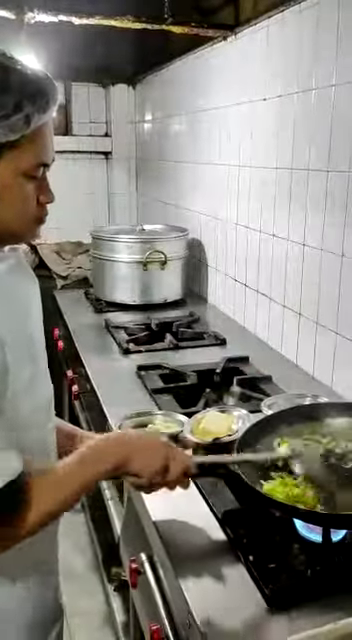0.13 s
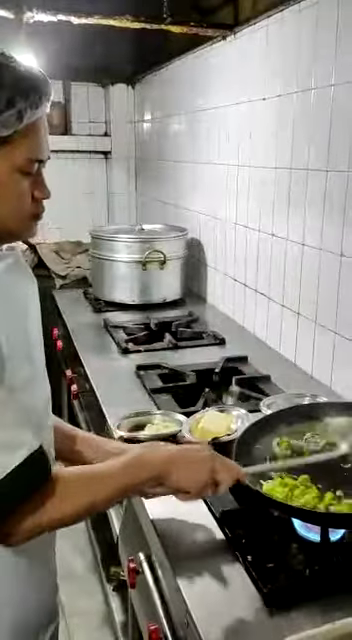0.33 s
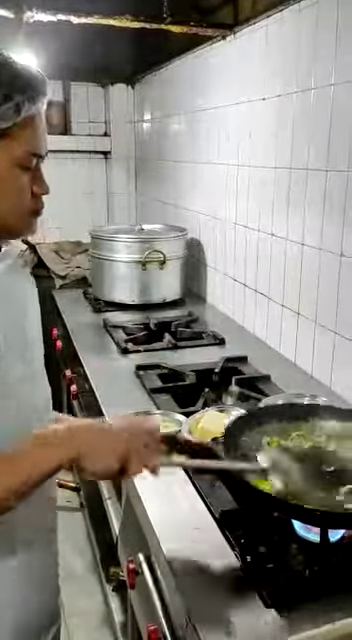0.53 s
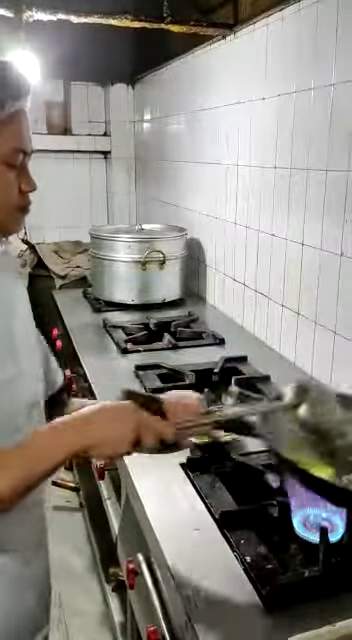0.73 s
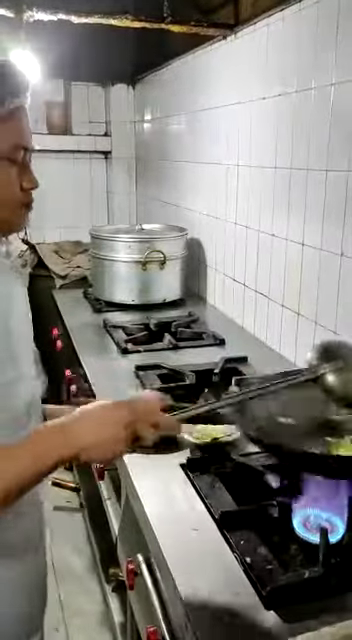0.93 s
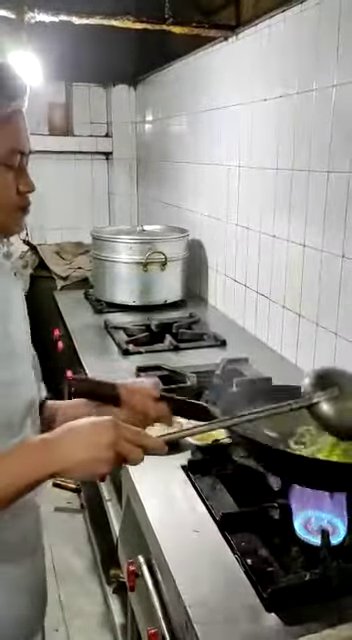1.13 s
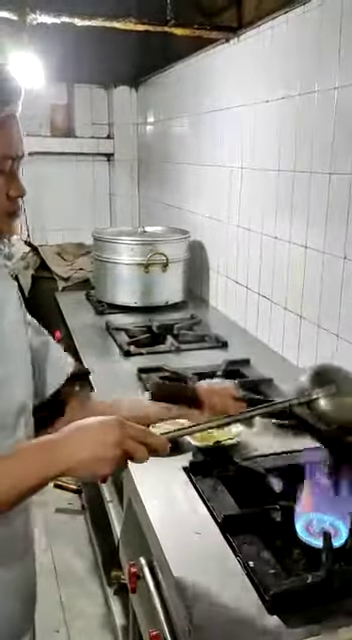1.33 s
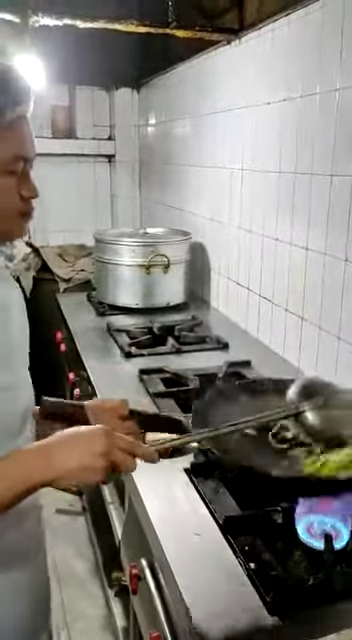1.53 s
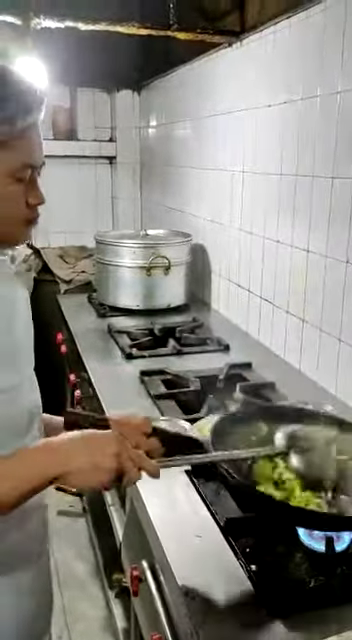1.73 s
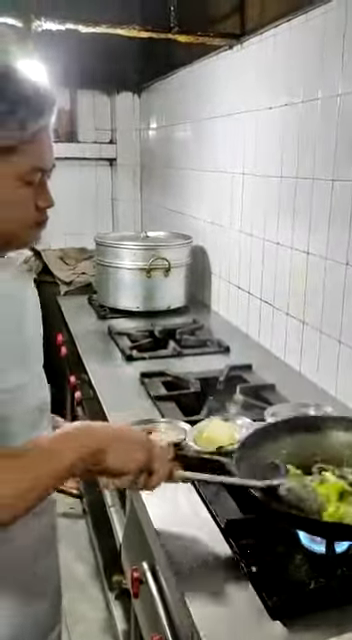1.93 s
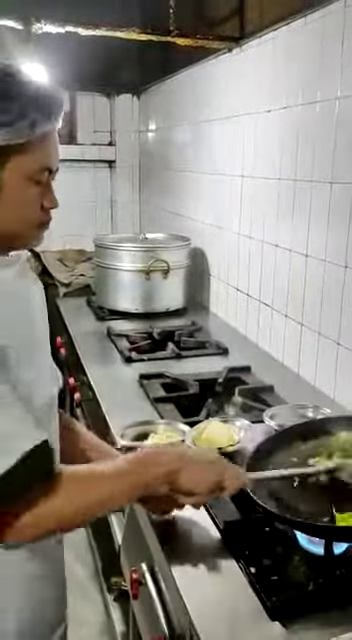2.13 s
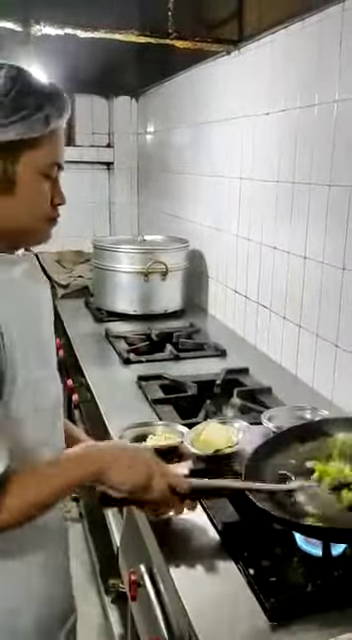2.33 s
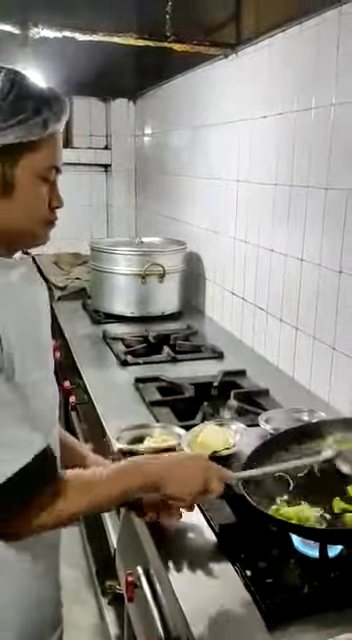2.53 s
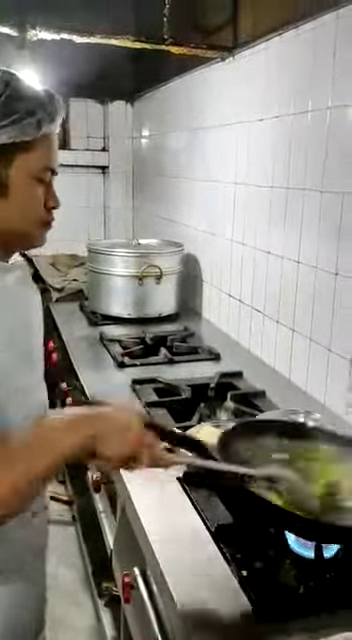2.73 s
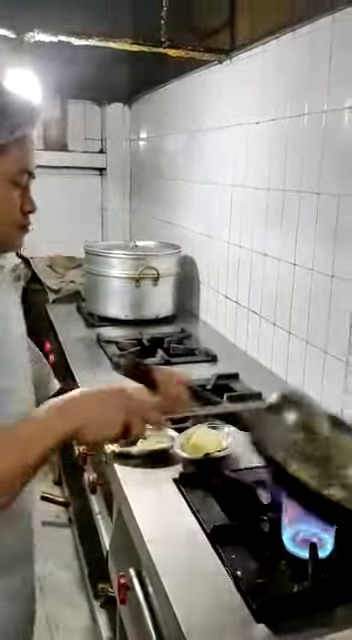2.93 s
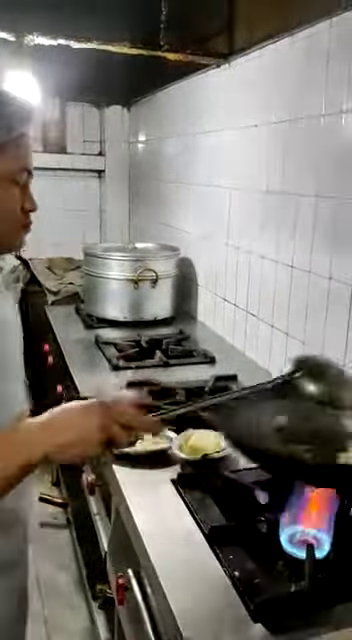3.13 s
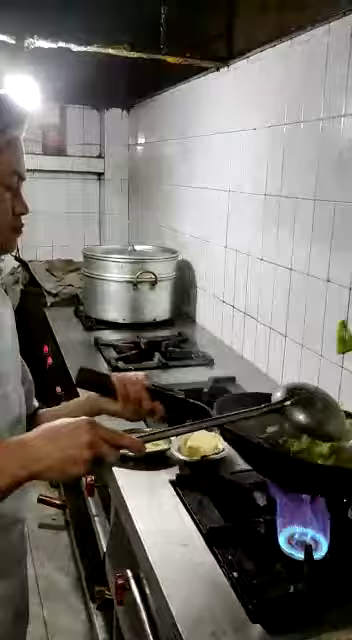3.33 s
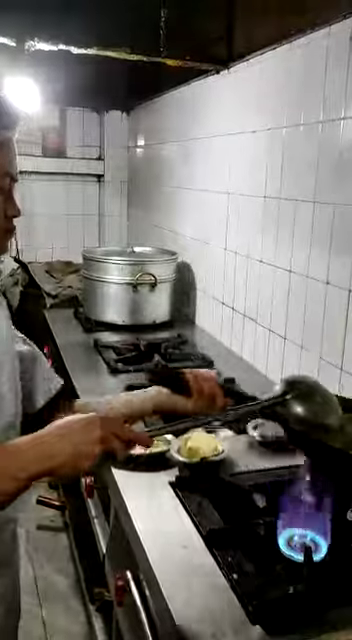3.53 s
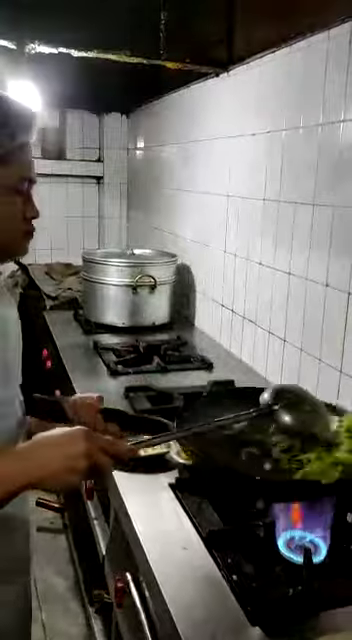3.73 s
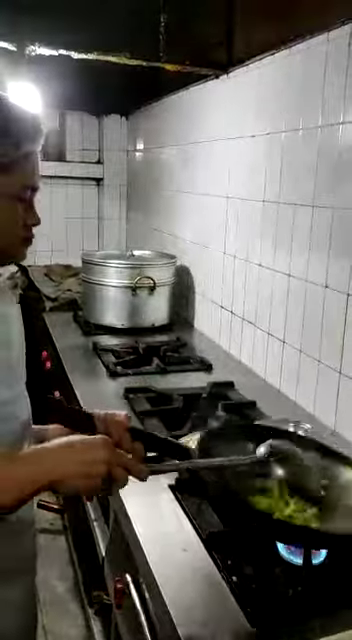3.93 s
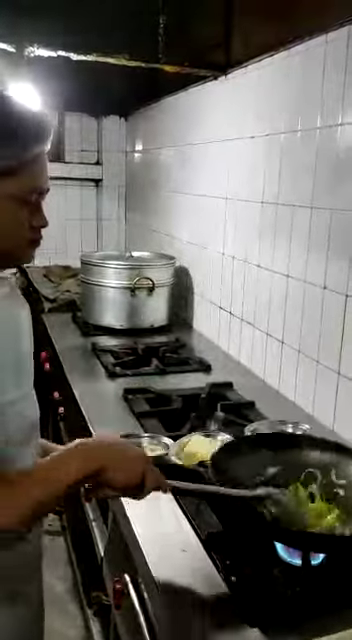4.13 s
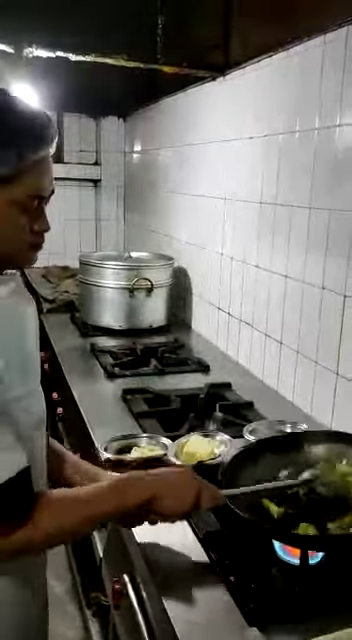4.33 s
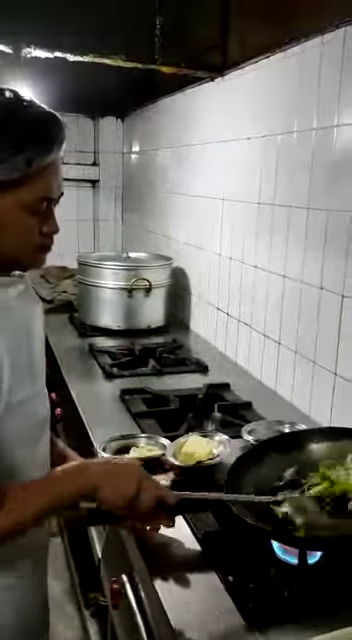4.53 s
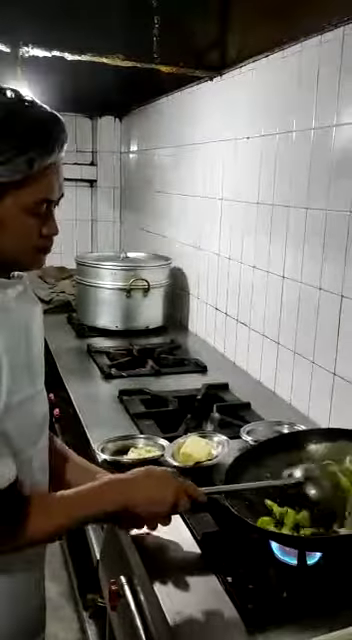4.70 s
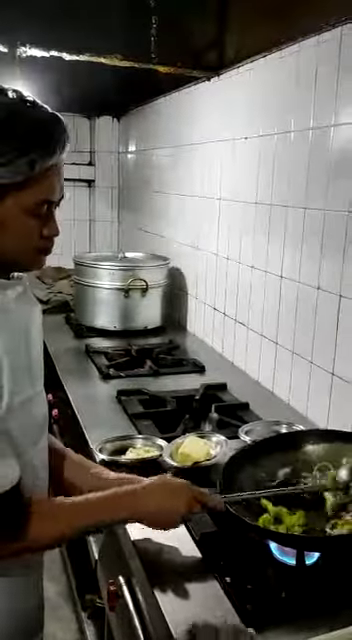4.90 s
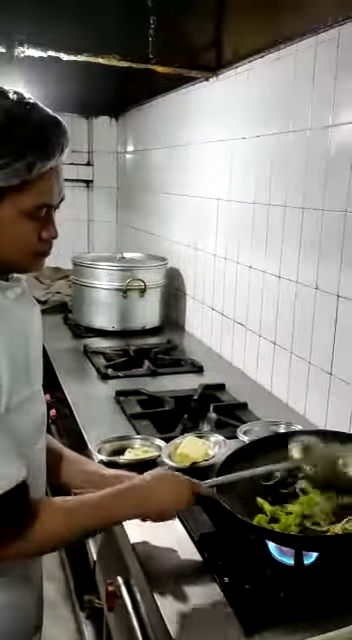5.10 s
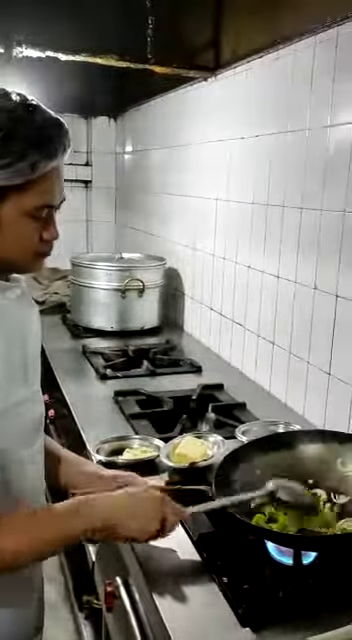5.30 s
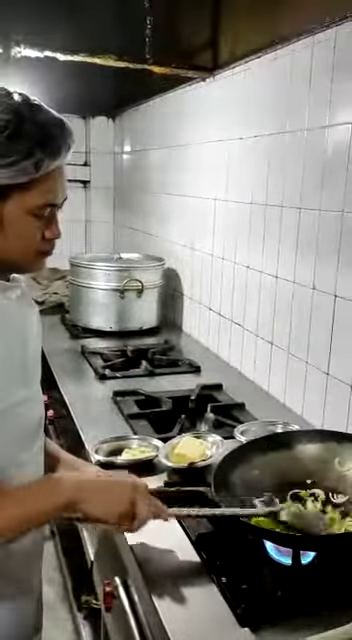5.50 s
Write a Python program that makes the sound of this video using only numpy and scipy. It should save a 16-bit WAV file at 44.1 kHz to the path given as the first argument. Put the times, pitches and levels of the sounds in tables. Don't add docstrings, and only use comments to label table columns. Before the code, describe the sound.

A bright, dense frying sizzle runs throughout, strongest in the high treble, with a softer spitting underneath. At first a ladle scrapes lightly; from 0.6 to 0.85 s it knocks the wok several times with a sharp crack and gritty drag. From about 1 to 1.75 s mostly sizzle remains, swelling and dipping with the toss. Knocks and scrapes return at 1.8-2.15 s, with a faint touch near 2.4. A hard, rapid clatter with bright cracks comes at 2.8-2.95 s. The hiss then dips deeply around 3.3 s. Heavy clanks and scrapes follow at 4.04-4.3 s, a smaller knock at 4.67, and a sharp scraping crack with a sizzling flare at 5.0, then light touches. Beneath, a gas flame flutters and roars softly, and a low wavering motor drone fades before 3 s. Close stereo phone pickup, short tiled-room reflections, loud peaks slightly rounded.

```python
import sys
import numpy as np
from scipy import signal
from scipy.fft import rfft, irfft, next_fast_len
from scipy.io import wavfile
from scipy.ndimage import uniform_filter1d

SR = 44100
rng = np.random.default_rng(int(sys.argv[2]) if len(sys.argv) > 2 else 0)


def bounce(signal):
    frames = np.transpose(np.atleast_2d(signal))
    limited = np.clip(frames, -1, 1)
    pcm = np.round(limited * 32767).astype(np.int16)
    wavfile.write(sys.argv[1], SR, pcm)


def voltage_ratio(level):
    return 10 ** (np.asarray(level, float) / 20)


N = 245195
TIME = np.arange(N) / SR


def unit(x):
    return x / np.sqrt(np.mean(x ** 2))


def columns(table):
    s, *rest = np.transpose(table)
    return [np.interp(TIME, s, column) for column in rest]


def on_log_axis(points, hz):
    f, value = np.transpose(points)
    return np.interp(np.log(hz + 1), np.log(f + 1), value)


def band(x, lo_hz, hi_hz):
    return signal.sosfilt(signal.butter(2, [lo_hz, hi_hz], "band", fs=SR, output="sos"), x)


def hump(middle_s, length_s):
    return np.cos(np.pi * np.clip((TIME - middle_s) / length_s, -.5, .5)) ** 2


def walk(rate):
    hold = int(SR / rate)
    levels = np.repeat(rng.standard_normal(N // hold + 1), hold)
    smooth = uniform_filter1d(uniform_filter1d(levels, hold), hold)
    return unit(smooth[:N])


def clicks(rate, spread_db):
    happens = rng.random(N) < rate / SR
    size = rng.exponential(size=N)
    sign = rng.choice([-1, 1], N)
    return unit(happens * sign * voltage_ratio(spread_db * np.minimum(size, 2)))


def bands(source, colour, flicker_db, flicker_rate):
    # frequency in Hz, likeness from 0 (unrelated) to 1 (same).
    likeness = [(60, 0.89), (130, 0.96), (290, 0.84), (630, 0.39), (1380, 0.03), (3020, 0.1), (6620, -0.03),
                (14500, -0.01)]
    size = next_fast_len(N)
    hz = np.arange(size // 2 + 1) * SR / size
    like = np.clip(on_log_axis(likeness, hz), -.9, .99)
    mid = rfft(source(), size) * np.sqrt(1 + like)
    side = rfft(source(), size) * np.sqrt(1 - like)
    pair = np.array([mid + side, mid - side]) * voltage_ratio(on_log_axis(colour, hz))
    place = 2 * np.log2((hz + 1) / colour[0][0])
    count = int(2 * np.log2(colour[-1][0] / colour[0][0])) + 2
    total = 0
    for k in range(count):
        share = np.cos(np.pi / 2 * np.clip(place - k, -1, 1)) ** 2
        total = total + irfft(pair * share, size)[:, :N] * voltage_ratio(flicker_db * walk(flicker_rate))
    return unit(total)


def ring(modes, drag, blows, count, scatter, roam_db, spread_hz):
    out, power = 0, 0
    for centre_hz, db, t60 in modes:
        push = (drag + blows) * voltage_ratio(db + roam_db * np.clip(walk(14), -1.5, 1.5))
        for k in range(count):
            hz = centre_hz * (1 + scatter * rng.uniform(-1.09, 1) * (k > 0))
            pole = np.exp(2j * np.pi * hz / SR - np.log(1000) / (t60 * SR))
            start_phase = np.exp(2j * np.pi * rng.random())
            z = signal.lfilter([start_phase], [1, -pole], push)
            turn = np.exp(.5j * np.pi * rng.uniform(-1.07, 1) * min(hz / spread_hz, 1) ** 2)
            out = out + np.array([(z * turn).imag, (z / turn).imag])
            power += voltage_ratio(db) ** 2 / (1 - abs(pole) ** 2) / 2
    return out / np.sqrt(power)


def contact(start_s, hold_s, db, attack_s, release_db_s):
    t = TIME - start_s
    return np.clip(t / attack_s, 0, 1) * voltage_ratio(db - release_db_s * np.clip(t - attack_s - hold_s, 0, 1))


def pressure():
    # start in seconds, hold in seconds, pressure in dB, rim share in dB.
    drag_times = [(0.0, 0.08, -39, -14), (0.127, 0.07, -37.5, -4), (0.37, 0.2, -43.5, -8),
                  (0.59, 0.23, -30, -6), (0.726, 0.064, -24, -10.5), (1.795, 0.02, -25, -12),
                  (1.896, 0.063, -29, -1), (1.964, 0.06, -25.5, -4.5), (2.055, 0.12, -31, -34),
                  (2.438, .05, -41, -8.5), (2.657, 0.13, -45, 0.5), (2.777, 0.14, -28.5, -4.5),
                  (2.839, .13, -23, -18), (4.04, .03, -20.5, -12), (4.098, 0.07, -24, -7),
                  (4.254, 0.046, -22.5, -10.5), (4.364, 0.18, -39.5, -9), (4.634, 0.056, -42.5, 1.5),
                  (4.989, 0.018, -24, -14), (5.07, 0.041, -34.5, -21), (5.303, .03, -65, 7)]
    # start in seconds, hold in seconds, level in dB.
    scrape_times = [(0.0, 0.51, -34.5), (0.588, .03, -26.5), (0.72, 0.033, -35), (0.954, 0.12, -40.5),
                    (1.966, 0.079, -28), (2.136, 0.067, -28.5), (2.409, 0.41, -34.5), (2.782, 0.016, -19.5),
                    (2.832, 0.031, -26.5), (2.973, 0.025, -43), (3.102, 0.048, -31.5),
                    (4.029, 0.045, -23.5), (4.148, 0.034, -22.5), (4.255, 0.15, -30), (4.548, 0.26, -37.5),
                    (4.994, 0.011, -19), (5.03, 0.099, -27.5), (5.32, 0.046, -36)]
    drags = np.array([contact(s, hold, db, attack_s=0.0061, release_db_s=107) ** 2
                      for s, hold, db, _ in drag_times])
    edge = sum(contact(*row, attack_s=0.0043, release_db_s=131) ** 2 for row in scrape_times)
    rim_share = voltage_ratio(np.array(drag_times)[:, 3]) ** 2
    return np.sqrt([drags.sum(axis=0), rim_share @ drags, edge])


def wok(gain):
    # time in seconds, peak in dB, rim share in dB, ladle ring share in dB.
    knock_times = [(0.604, -20.5, -36, -9), (0.676, -14.5, -11.5, -21), (0.74, -9.5, -15, -22.5),
                   (0.821, -12, -26, -25), (1.801, -18.5, -11, -14), (1.87, -19.5, -28, -27),
                   (1.906, -16.5, -16, -12.5), (1.958, -22.5, -9, -1), (2.423, -38, -25, -15),
                   (2.789, -24.5, -16, 0.5), (2.84, -11.5, -13, -23), (2.881, -13.5, -13, -7.5),
                   (2.92, -12, -20, -32), (2.944, -16, -16.5, -31), (3.672, -37, -17, 5.5),
                   (4.041, -5, -16.5, -19), (4.06, -29, -30, -11), (4.116, -28, -17, -23),
                   (4.16, -13, -21, -27), (4.269, -16.5, -9.5, -9.5), (4.669, -22, -30, -8),
                   (4.991, -42, -25, 3), (4.997, -36, -18, -23), (5.219, -39, -3, -5),
                   (5.314, -42.5, -26, 4)]
    # frequency in Hz, level in dB, seconds to fade by 60 dB.
    bowl_modes = [(132.2, 1.5, 0.26), (188, -21, 0.13), (251, 7.5, 0.14), (263.5, 1, 0.086), (294, 4, 0.06),
                  (331.6, 3.5, 0.18), (366, 2, 0.3), (433, -3, 0.048), (453, 3.5, 0.1), (488, -1.5, 0.11),
                  (545, -1, 0.095), (573, -13.5, 0.08), (342, 2.5, 0.034)]
    rim_modes = [(725, -5, 0.063), (770.6, -6, 0.13), (870, 2, 0.064), (949, 4.5, 0.048), (1023, 8, 0.027),
                 (1050, -7.5, 0.12), (1099, 3, 0.061), (1147, 2, 0.034), (1240, -19, 0.03),
                 (1340, -4.5, 0.072), (1501, -5, 0.056), (1750, -14.5, 0.14), (2110, -10.5, 0.067),
                 (830, 14, 0.0055)]
    ladle_modes = [(2435, 2.5, 0.057), (2590, 12, 0.02), (2860, -13, 0.58), (3325, -1, 0.26),
                   (3436, 8.5, 0.25), (3560, 0, 0.081), (3504, 2, 0.29), (3850, 9.5, 0.1),
                   (4106, 8.5, 0.11), (4140, -15, 0.085), (4460, 5, 0.25), (4620, 9.5, 0.17),
                   (4990, 7, 0.13), (5190, 6.5, 0.14), (5743, 6.5, 0.55), (6150, 8.5, 0.038),
                   (7100, -4, 0.11)]
    s, db, rim_db, ladle_db = np.transpose(knock_times)
    blows = np.zeros((3, N))
    blows[:, (s * SR).astype(int)] = voltage_ratio([db, db + rim_db, db + ladle_db])
    slip = clicks(600, spread_db=1.5)
    grit = clicks(2500, spread_db=6.0)
    bowl = ring(bowl_modes, gain[0] * slip, voltage_ratio(19.5) * blows[0],
                count=2, scatter=0.029, roam_db=2.5, spread_hz=730)
    rim = ring(rim_modes, gain[1] * slip, voltage_ratio(26) * blows[1],
               count=3, scatter=0.0485, roam_db=4.0, spread_hz=1120)
    pressed = [(hz, level, .22 * t60) for hz, level, t60 in ladle_modes]
    scrape = ring(pressed, gain[2] * grit * voltage_ratio(-5.0), 0,
                  count=3, scatter=0.037, roam_db=5.5, spread_hz=850)
    free = [(hz, level, 1.7 * t60) for hz, level, t60 in ladle_modes]
    clang = ring(free, 0, voltage_ratio(26.5) * blows[2],
                 count=2, scatter=0.0444, roam_db=6.5, spread_hz=850)
    return band(bowl, 65, 720) + band(rim, 600, 2400) + band(scrape + clang, 1400, 6000)


def frying():
    # frequency in Hz, level in dB per Hz.
    fry_colour = [(880, -32.5), (1500, -28.5), (1800, -28.5), (1960, -25.5), (2550, -24.5), (2780, -23.5),
                  (4240, -18.5), (4760, -18.5), (6920, -13.5), (8800, 0), (9600, -6), (10600, -4),
                  (13800, -13.5), (14500, -42), (14900, -93)]
    # time in seconds, level in dB, extra low spit in dB.
    heat = [(0.0, -21.5, -1.5), (0.6, -21, 1.5), (1.0, -17.5, 1), (1.45, -16.5, 0.5), (1.75, -21.5, 0),
            (2.5, -20.5, 0.5), (3.1, -19, -1.5), (3.6, -22.5, 0.5), (4.35, -20, -1), (4.55, -26, 1),
            (4.9, -22.5, -3), (5.56, -21, 1.5)]
    # middle in seconds, length in seconds, depth in dB.
    covers = [(0.426, .2, -2.5), (0.67, 0.12, -2.5), (0.856, .2, -1.5), (1.111, 0.21, -6.5),
              (1.384, 0.17, -2.5), (1.618, 0.27, -6.5), (1.927, 0.071, -3), (2.087, 0.24, -2.5),
              (2.38, 0.22, -2.5), (2.91, 0.15, -3), (3.066, 0.14, -2.5), (3.335, 0.37, -13), (3.59, .08, 1),
              (3.859, 0.21, -8), (4.117, 0.19, -2), (4.24, 0.21, -2.5), (4.587, 0.071, 0), (4.97, 0.16, -3),
              (5.28, 0.24, -2), (5.507, 0.13, -4)]
    # time in seconds, rise in dB.
    flares = [
        (0.57, 1.5),
        (2.2, 1.5),
        (2.786, 4.5),
        (2.98, 2),
        (4.04, 5.5),
        (4.163, 7),
        (4.99, 8.5),
    ]
    attack_s, fade_s = 0.002, 0.041
    db, spit_db = columns(heat)
    flare_db = 0
    for s, rise_db in flares:
        since = np.clip(TIME - s, 0, 1)
        flare_db = flare_db + rise_db * np.minimum(since / attack_s, 1) * np.exp(-since / fade_s)
    db = db + flare_db + sum(depth_db * hump(s, length) for s, length, depth_db in covers)
    pan_db = -0.8 + 0.8 * walk(6)

    def bubbles():
        small_pops = 0.58 * clicks(5000, spread_db=3.5)
        big_pops = 0.14 * clicks(90, spread_db=4.0)
        return rng.standard_normal(N) + small_pops + big_pops

    fizz = bands(bubbles, fry_colour, flicker_db=0.03, flicker_rate=5.1)
    low = signal.sosfiltfilt(signal.butter(2, 6000, fs=SR, output="sos"), fizz)
    spit = low * voltage_ratio(spit_db + flare_db)
    return (fizz - low + spit) * voltage_ratio(db + np.array([pan_db, -pan_db]) / 2)


def burner(sliding):
    # frequency in Hz, level in dB per Hz.
    flutter_colour = [(14, -39), (24, 3), (59, -1.5), (80, 2.5), (92, -7), (102, -55), (125, 9), (160, -5),
                      (280, -120)]
    roar_colour = [(65, -7), (110, -12), (183, 1.5), (214, -8.5), (283, -8.5), (501, -14.5), (546, -12.5),
                   (573, -8.5), (989, -19.5), (2000, -33), (2600, -13), (4400, -120)]
    # time in seconds, level in dB.
    flutter_level = [
        (0.0, -57),
        (0.9, -36.5),
        (1.36, -46.5),
        (2.1, -38),
        (2.75, -60),
        (3.0, -50),
        (4.4, -41),
        (4.77, -53),
        (5.1, -55),
        (5.56, -54),
    ]
    air = lambda: rng.standard_normal(N)
    flutter = bands(air, flutter_colour, flicker_db=3.0, flicker_rate=2.83)
    roar = bands(air, roar_colour, flicker_db=2.5, flicker_rate=8.7)
    keep = np.exp(-1 / (0.029 * SR))
    fanned = voltage_ratio(-14) * signal.lfilter([1 - keep], [1, -keep], sliding)
    return flutter * voltage_ratio(columns(flutter_level)[0]) + roar * np.hypot(voltage_ratio(-44.5), fanned)


def motor():
    # time in seconds, turning rate in Hz.
    turning = [
        (0.0, 30.4),
        (0.66, 32.57),
        (1.48, 33.8),
        (2.16, 36.06),
        (2.69, 34.2),
        (2.9, 33.8),
    ]
    multiple_db = [-53.5, -49.5, -55]
    # middle in seconds, length in seconds, which multiple, rise in dB.
    swells = [(0.11, 0.84, 2, 7), (0.6, .4, 1, 6), (0.834, 1, 3, 17), (1.111, 0.57, 2, 7.5),
              (1.554, 0.76, 1, 12.5), (1.52, .4, 2, 0), (1.596, 0.73, 3, 11.5), (2.03, .3, 1, 4),
              (2.033, .3, 3, 8), (2.15, 0.27, 2, 6), (2.69, .3, 1, 4)]
    phase = 2 * np.pi * np.cumsum(columns(turning)[0]) / SR
    fade = np.clip((turning[-1][0] - TIME) / .15, 0, 1)
    drone = 0
    for k, db in enumerate(multiple_db, start=1):
        swell_db = sum(rise_db * hump(s, length) for s, length, multiple, rise_db in swells
                       if round(multiple) == k)
        drone = drone + voltage_ratio(db + swell_db) * np.sin(k * phase)
    return fade * np.sqrt(2) * drone


def cracks():
    # time in seconds, peak in dB.
    crack_times = [
        (0.599, -10.5),
        (0.742, -30),
        (1.9592, -14),
        (2.7872, -4),
        (2.846, -4),
        (4.0402, -25),
        (4.1599, -8),
        (4.993, -7),
    ]
    s, db = np.transpose(crack_times)
    blows = np.zeros((1, N))
    blows[0, (s * SR).astype(int)] = voltage_ratio(db)
    t = TIME[:SR // 5]
    decay = voltage_ratio(-60 * t / 0.03) + 0.26 * voltage_ratio(-60 * t / 0.092)
    burst = band(rng.standard_normal((2, len(t))) * decay, 2430, 8600)
    return voltage_ratio(-7.0) * signal.fftconvolve(blows, burst, axes=1)[:, :N]


def kitchen(x, t60, dull_hz, shared_hz):
    t = TIME[:SR // 2]
    mid, side = rng.standard_normal((2, len(t))) * voltage_ratio(-60 * t / t60) * (t > .004)
    side = band(side, shared_hz, 20000)
    tail = band(np.array([mid + side, mid - side]), 75, dull_hz)
    return signal.fftconvolve(x, tail / np.sqrt(np.sum(tail ** 2) / 2), axes=1)[:, :N]


def scene():
    gain = pressure()
    metal = wok(gain) + cracks()
    room = voltage_ratio(-9.5) * kitchen(metal, t60=0.48, dull_hz=6530, shared_hz=483)
    return metal + room + frying() + burner(gain[0]) + motor()


def band_limit(x):
    return signal.sosfilt(signal.butter(12, 15090, fs=SR, output="sos"), x)


def record(dry):
    # frequency in Hz, left minus right in dB.
    balance = [(60, 0.5), (110, 1.0), (200, 1.0), (370, 1.5), (690, 0.0), (1260, 2.0), (2330, 1.5),
               (4280, 0.5), (7880, -4.0), (14500, 6.0)]
    size = next_fast_len(N)
    tilt_db = on_log_axis(balance, np.arange(size // 2 + 1) * SR / size) / 2
    x = irfft(rfft(dry, size) * voltage_ratio([tilt_db, -tilt_db]), size)[:, :N]
    return band_limit(np.tanh(0.75 * x) / 0.64)


dry = scene()
out = record(dry)
bounce(out)
```